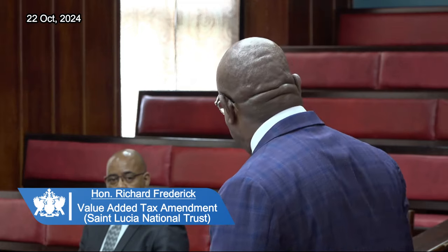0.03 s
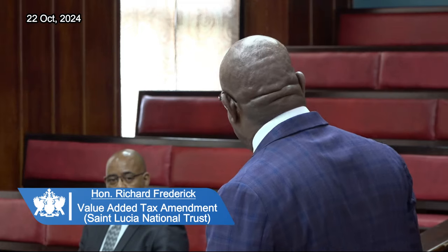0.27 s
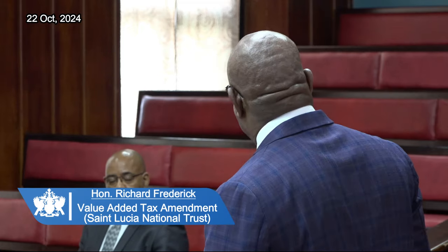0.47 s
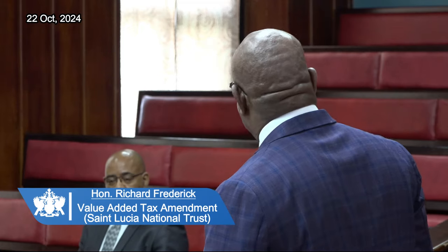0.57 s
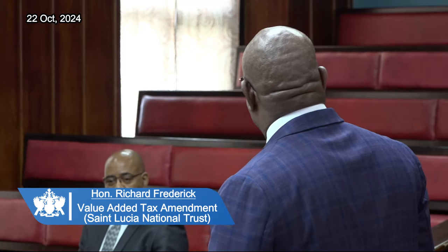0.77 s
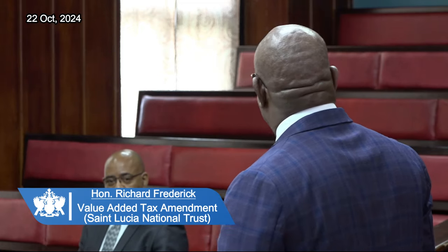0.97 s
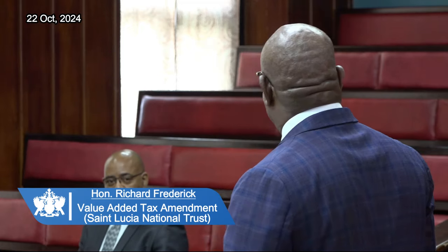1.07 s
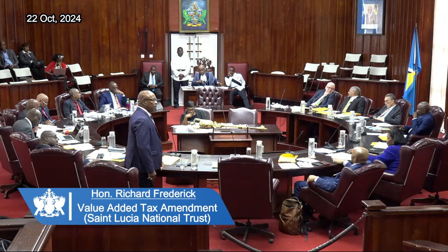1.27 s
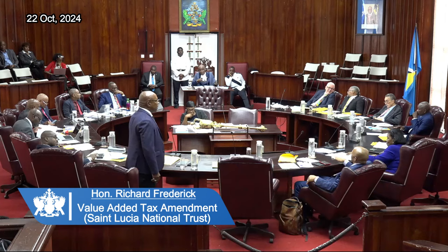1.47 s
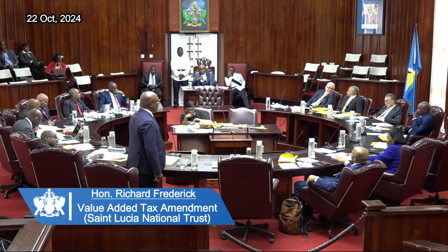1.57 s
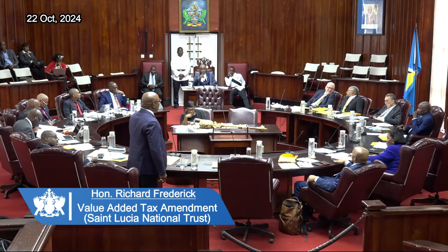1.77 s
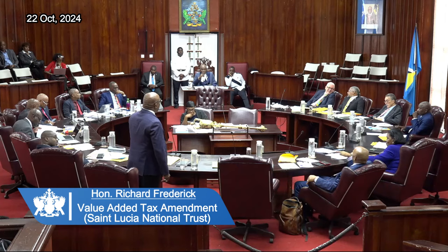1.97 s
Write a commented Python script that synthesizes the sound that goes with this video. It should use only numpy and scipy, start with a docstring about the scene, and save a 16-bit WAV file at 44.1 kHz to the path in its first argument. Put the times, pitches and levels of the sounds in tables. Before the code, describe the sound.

Hard flat-handed slaps on desk tops, about three a second, booming and clipping in a lively hall

```python
"""Palms pounding desks

Two or three palms pound wooden desks nearly together, three times a second, in a panelled chamber.
Each blow is skin snapping on varnish, a slap of decaying modes and noise, and the boom of the desk.
The desk top delays low pitches, so treble arrives first. Discrete taps give the wall echoes and
decaying random taps the room; small ticks rattle over shaped noise. The desk microphone
overloads on the loudest blows: its peaks are cut flat."""
import sys
import numpy as np
from scipy import signal
from scipy.fft import rfft, irfft
from scipy.io import wavfile
from scipy.ndimage import uniform_filter1d

SR = 44100
rng = np.random.default_rng(int(sys.argv[2]) if len(sys.argv) > 2 else 0)


def linear_from_db(decibels):
    """Turn decibels (scalar or array-like) into linear amplitude factors; 0 gives 1."""
    return 10 ** (np.asarray(decibels, float) / 20)


def wav_record(signal):
    """Record a signal, one row per channel, as 16-bit PCM in the file named by sys.argv[1]."""
    frames = np.transpose(np.atleast_2d(signal))
    bounded = np.clip(frames, -1, 1)
    # unit amplitude maps onto the largest positive 16-bit level
    quanta = np.round(bounded * 32767).astype(np.int16)
    wavfile.write(sys.argv[1], SR, quanta)


N = 88817

# steady hush of the chamber, relative spectrum: f/Hz, level/dB per Hz
HUSH_COLOUR = [(18, -40), (30, -6), (304, -5.5), (437, -10), (612, -19), (3590, -30), (3880, -27),
               (10200, -44.5), (15000, -52)]
# ringing of the room: f/Hz, time to fall 60 dB/s
ROOM_DECAY = [(60, 1), (160, 0.44), (420, 0.52), (1100, 0.76), (2900, 0.62), (7700, 0.53), (14000, 0.86)]
# spectrum of the room's answer to a blow: f/Hz, level/dB
ROOM_TONE = [(40, 4.5), (80, -0.5), (200, -6), (400, 8), (700, 1), (1200, 1.5), (2200, -1.5), (4000, -10.5),
             (5500, -18.5), (8000, -22), (12000, -37.5), (15000, -48)]
# single wall echoes: delay t/s, level/dB
WALL_ECHOES = [(.0183, -7.5), (.0285, -13), (.039, -7.5), (.052, -10), (.061, -15.5)]
# spectrum of the wall echoes: f/Hz, level/dB
WALL_TONE = [(300, -16), (1200, -3), (2500, -8), (4000, -1), (5500, -18), (9000, -6.5), (15000, -6)]
# palm blows: t/s, slap level/dB, slap f/Hz, snap level/dB, level into room/dB, brightness/dB,
# then the level/dB of each of the four desk booms
PALM_BLOWS = [(-.31, -4, 1000, -15, -6, 0, -10, -14, -14, -8),
              (0.0102, -2, 610, -5, -4.5, -4, -6.5, -4, -8, 2),
              (0.0153, -2.5, 1220, -1, -6.5, -1.5, -21, -28, -21, -3),
              (0.3266, -10, 930, -9.5, -8.5, -2, -9.5, -11, -13.5, -23),
              (.3430, -1.5, 800, -3.5, -6, 6.5, -29, -11, -14.5, -2),
              (.6480, 3, 760, -7, -4.5, -2, -11, -7, -7, -24),
              (0.6613, -36, 1190, -3.5, -13.5, -6, -20, -10, -10.5, -27),
              (.9540, -1.5, 1290, -9.5, -6.5, -3, -19.5, -13, -16, -10.5),
              (0.988, -27, 1210, -16, -16, -13, -24.5, -13.5, -35, -18.5),
              (1.291, -13, 1310, -15.5, -15.5, 0, -29, -10, -22, -23),
              (1.2970, -0.5, 1324, -11, -8.5, 8, -19, -9.5, -15.5, -13.5),
              (1.615, -13, 840, -14, -20.5, -2.5, -22, -10.5, -14, -19.5),
              (1.6401, -1, 1115, -9, -12, 8.5, -34, -10, -17, -11.5),
              (1.9420, -11, 800, -17.5, -21.5, -1.5, -23.5, -9.5, -18, -16)]
# spectrum of skin on varnish: f/Hz, level/dB
SNAP_TONE = [(300, -2), (1000, -3.5), (2500, 10), (4000, 0), (6000, -0.5), (9000, -14.5), (12000, -15),
             (15000, -31)]
# booming desk modes before detuning: f/Hz, time to fall 60 dB/s
DESK_BOOMS = [(76, 0.3029), (197, 0.1955), (283, 0.1827), (317, 0.1139)]
# knocking desk-top modes before detuning, strongest near the slap pitch:
# f/Hz, level/dB, time to fall 60 dB/s
TOP_KNOCKS = [(142.5, -12, 0.49), (461, -2.5, 0.055), (545.4, -3.5, 0.055), (631, -16, 0.067),
              (800, -1, 0.03), (1023, 0.5, 0.024), (1250, -0.5, 0.027), (1371, -15.5, 0.015),
              (1665, 3, 0.028), (2180, -1, 0.047)]
# small things rattling on the desks: t/s, level before the high-pass/dB
RATTLES = [(.229, -39), (0.244, -39), (.592, -49), (.983, -30), (1.136, -46), (1.436, -35), (1.739, -44)]

FFT_SIZE = 16384  # samples in the working buffer of a blow
TOUCH_S = 0.00089  # the palm lands over this time
BRIGHT_HZ, BRIGHT_WIDTH_HZ = 3320, 740  # band moved by the brightness of a blow
BENDING_LAG_S = 0.00219  # delay is this times (sqrt(1000 / f) - 0.5), so nil at 4 kHz
SNAP_LAG_SHARE = 0.613  # the snap takes only this share of the delay
TIPS_DB, TIPS_LEAD_S = -18.5, 0.0034  # fingertips land a little ahead of the palm
CRACK_DB, CRACK_AT_S, SNAP_T60_S = 10.5, 0.0012, 0.014  # sharp pulse inside the snap; decay of its hiss
SLAP_WIDTH_HZ, SLAP_RING_T60_S, SLAP_NOISE_T60_S = 470, 0.008, 0.016
DETUNE = 0.015  # largest share by which a mode shifts at random from blow to blow
BOOM_RISE_S, BOOM_BEND = 0.0093, 1.41  # a bend above 1 damps ever harder: the palm rests on the desk
LOW_PAIR = 0.091  # the lowest boom is a pair of modes, this share below and above
WAVER_WIDTH_HZ, WAVER_DB = 61, -5  # dense small modes make each higher boom waver
ROOM_RISE_S, CLAP_GAIN_DB, BOOM_IN_ROOM_DB, SLAP_IN_ECHO_DB = 0.016, 28.5, -14, -5.5
CLUMP_DB, CLUMP_FADE_S, CLUMP_S = 5.5, 0.097, 0.0034  # early reflections come in uneven clumps


def evened(x):
    """Scales a sound to rms 1."""
    return x / np.sqrt(np.mean(x ** 2) + 1e-20)


def read(points, hz):
    """Reads a table along log frequency."""
    f, value = np.transpose(points)
    return np.interp(np.log(hz + 1), np.log(f + 1), value)


def colour(x, points):
    """Shapes a sound with a dB spectrum, leaving its phase alone."""
    hz = np.fft.rfftfreq(len(x), 1 / SR)
    return irfft(rfft(x) * linear_from_db(read(points, hz)), len(x))


def bell(x, hz, width):
    """Keeps a bell-shaped band of a sound."""
    offset = (np.fft.rfftfreq(len(x), 1 / SR) - hz) / width
    return irfft(rfft(x) / (1 + offset ** 2), len(x))


def ring(t, hz, t60):
    """One dying mode."""
    return np.sin(2 * np.pi * hz * t) * linear_from_db(-60 * t / t60)


def add(mix, s, sound):
    """Lays a sound into the mix, which starts half a second early."""
    part = mix[round(s * SR) + SR // 2:][:len(sound)]
    part += sound[:len(part)]


def air():
    """The steady hush of the chamber: shaped noise."""
    return linear_from_db(-41.5) * evened(colour(rng.standard_normal(N), HUSH_COLOUR))


def tail():
    """A swelling tail of sparse taps, clumped at first, each band dying at its own speed."""
    taps, t = np.zeros(SR), np.arange(SR) / SR
    slots = np.arange(300, SR - 20, 12)
    # one tap of random sign somewhere in each slot
    taps[slots + rng.integers(0, 12, len(slots))] = rng.choice([-1., 1.], len(slots))
    clumps = evened(uniform_filter1d(rng.standard_normal(SR), round(CLUMP_S * SR)))
    swell = 1 - np.exp(-(t / ROOM_RISE_S) ** 2)
    taps *= swell * linear_from_db(CLUMP_DB * np.exp(-t / CLUMP_FADE_S) * clumps)
    hz, frame_t, bands = signal.stft(taps, SR, nperseg=512)
    decay = linear_from_db(-60 * frame_t / read(ROOM_DECAY, hz)[:, None])
    ringing = signal.istft(bands * decay, SR, nperseg=512)[1][:SR]
    return ringing / np.linalg.norm(ringing)


def chamber(knock, boom, room_db, bright_db):
    """Single wall echoes of the knock, and the room ringing on after the blow."""
    ringing = tail()
    bright = (linear_from_db(bright_db) - 1) * bell(ringing, BRIGHT_HZ, BRIGHT_WIDTH_HZ)
    clap = linear_from_db(room_db + CLAP_GAIN_DB) * colour(ringing + bright, ROOM_TONE)
    boom_in_room = linear_from_db(BOOM_IN_ROOM_DB) * signal.fftconvolve(boom, ringing)[:SR]
    lead = 200  # samples of space for the pre-ring of the colouring
    walls = np.zeros(FFT_SIZE // 2)
    for s, db in WALL_ECHOES:
        walls[round(s * SR) + lead] = linear_from_db(db)
    echo = signal.fftconvolve(knock, colour(walls, WALL_TONE))[lead:]
    return clap + boom_in_room + np.pad(echo, (0, SR - len(echo)))


def desk_top(sound, share=1):
    """Bending waves carry the treble to the microphone first."""
    hz = np.fft.rfftfreq(FFT_SIZE, 1 / SR)
    lag = np.exp(-4j * np.pi * share * BENDING_LAG_S * (np.sqrt(1000 * hz) - hz / 4))
    return irfft(rfft(sound) * lag, FFT_SIZE)[:FFT_SIZE * 3 // 4]


def skin(snap_db, bright_db):
    """The snap of skin on varnish: a sharp crack in a short hiss."""
    t = np.arange(FFT_SIZE) / SR
    touch = 1 - np.exp(-(t / TOUCH_S) ** 2)
    hiss = rng.standard_normal(FFT_SIZE) * linear_from_db(-60 * t / SNAP_T60_S) * touch
    crack = linear_from_db(CRACK_DB) * np.sinc((t - CRACK_AT_S) * SR)
    # move away from the buffer edge while filtering, then back
    snap = np.roll(hiss + crack, 400)
    snap += (linear_from_db(bright_db) - 1) * bell(snap, BRIGHT_HZ, BRIGHT_WIDTH_HZ)
    snap = np.roll(colour(snap, SNAP_TONE), -400)
    return linear_from_db(snap_db) * desk_top(snap, SNAP_LAG_SHARE)


def blow(slap_db, slap_hz, boom_db):
    """Slap of trapped air knocking the desk top's modes; boom of the wood in its own slower modes."""
    t = np.arange(FFT_SIZE) / SR
    boom_noise, slap_noise = rng.standard_normal((2, FFT_SIZE))
    shift = 1 + DETUNE * rng.uniform(-1, 1, len(DESK_BOOMS) + len(TOP_KNOCKS))

    slap = ring(t, slap_hz, SLAP_RING_T60_S)
    rough = evened(bell(slap_noise, slap_hz, SLAP_WIDTH_HZ))
    slap += rough * linear_from_db(-60 * t / SLAP_NOISE_T60_S)
    for (hz, db, t60), detune in zip(TOP_KNOCKS, shift[len(DESK_BOOMS):]):
        nearness = 1 / (1 + ((hz - slap_hz) / SLAP_WIDTH_HZ) ** 2)
        slap += linear_from_db(db) * nearness * ring(t, hz * detune, t60)
    touch = 1 - np.exp(-(t / TOUCH_S) ** 2)

    waver = 1 + linear_from_db(WAVER_DB) * evened(bell(boom_noise, 0, WAVER_WIDTH_HZ))
    boom = np.zeros(FFT_SIZE)
    for (hz, t60), db, detune in zip(DESK_BOOMS, boom_db, shift):
        decay = linear_from_db(db - 60 * (t / t60) ** BOOM_BEND)
        # the cosine splits the lowest mode into its pair
        motion = waver if hz > 100 else np.cos(2 * np.pi * hz * LOW_PAIR * t)
        boom += decay * np.sin(2 * np.pi * hz * detune * t) * motion
    rise = 1 - np.exp(-t / BOOM_RISE_S)
    return desk_top(linear_from_db(slap_db) * touch * slap), desk_top(rise * boom)


def tick(db):
    """A thin click of a rattling object: a short high-passed noise burst."""
    t = np.arange(600) / SR
    burst = rng.standard_normal(600) * linear_from_db(-60 * t / 0.011)  # 60 dB down in 11 ms
    return linear_from_db(db) * signal.lfilter(*signal.butter(2, 7900, "high", fs=SR), burst)


def scene():
    """Palms, desks, rattles and hush together; every blow sets off a fresh random room tail."""
    mix = np.zeros(N + SR // 2)
    for s, slap_db, slap_hz, snap_db, room_db, bright_db, *boom_db in PALM_BLOWS:
        snap = skin(snap_db, bright_db)
        slap, boom = blow(slap_db, slap_hz, boom_db)
        fingertips = skin(snap_db + TIPS_DB, 0)
        add(mix, s - TIPS_LEAD_S, fingertips)
        add(mix, s, snap + slap + boom)
        knock = snap + linear_from_db(SLAP_IN_ECHO_DB) * slap
        add(mix, s, chamber(knock, boom, room_db, bright_db))
    for s, db in RATTLES:
        add(mix, s, tick(db))
    return (mix[SR // 2:] + air())[None]


def band_limit(x):
    """A steep low-pass at the top of the band."""
    return signal.sosfilt(signal.butter(12, 15800, fs=SR, output="sos"), x)


def record(dry):
    """A steep treble limit and a low cut, then loud peaks cut flat and a second treble limit."""
    treble_limit = signal.ellip(8, 0.5, 30, 14500, fs=SR, output="sos")
    low_cut = signal.butter(2, 34, "high", fs=SR, output="sos")
    limited = signal.sosfilt(low_cut, signal.sosfilt(treble_limit, dry))
    overloaded = np.clip(limited, -0.78, 0.78)
    edge = signal.firwin(511, 15700, window=("kaiser", 9), fs=SR)
    finished = signal.oaconvolve(overloaded, edge[None], "same")
    return band_limit(finished)


dry = scene()
out = record(dry)
wav_record(out)
```